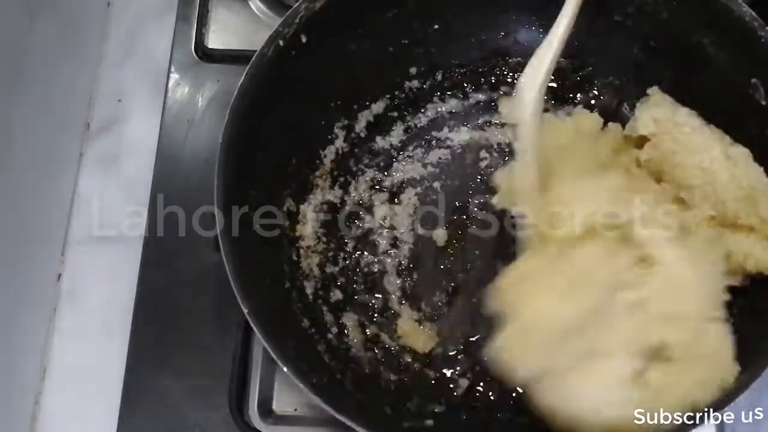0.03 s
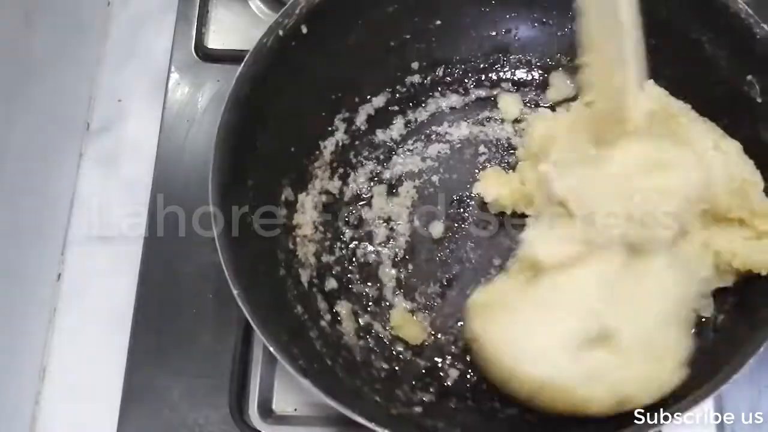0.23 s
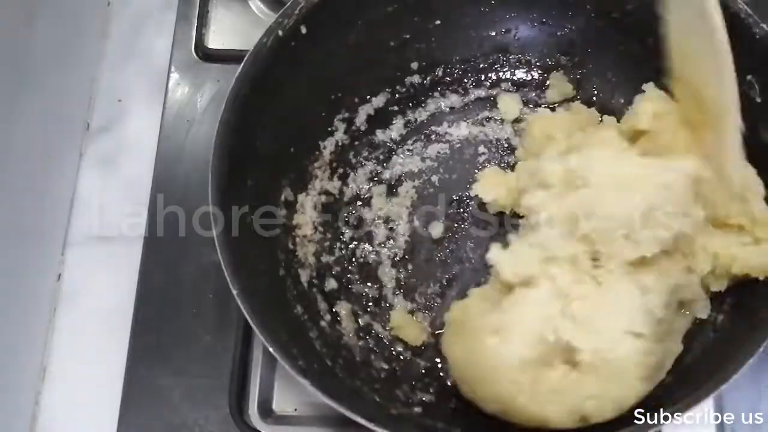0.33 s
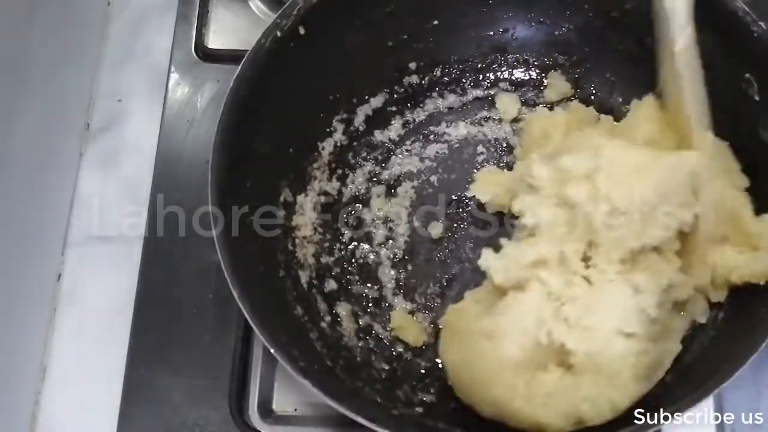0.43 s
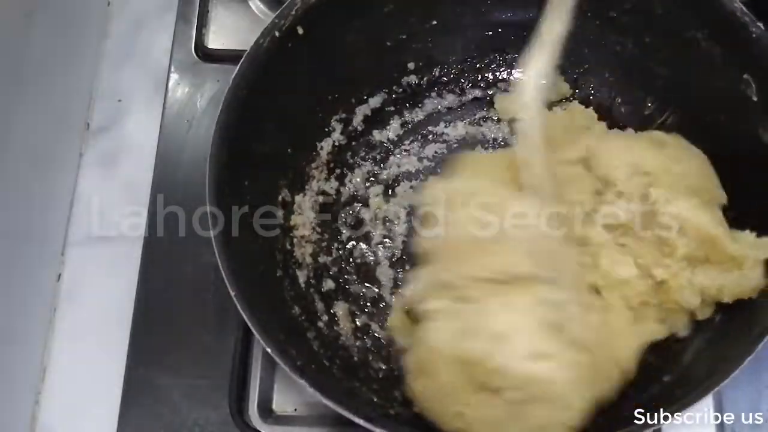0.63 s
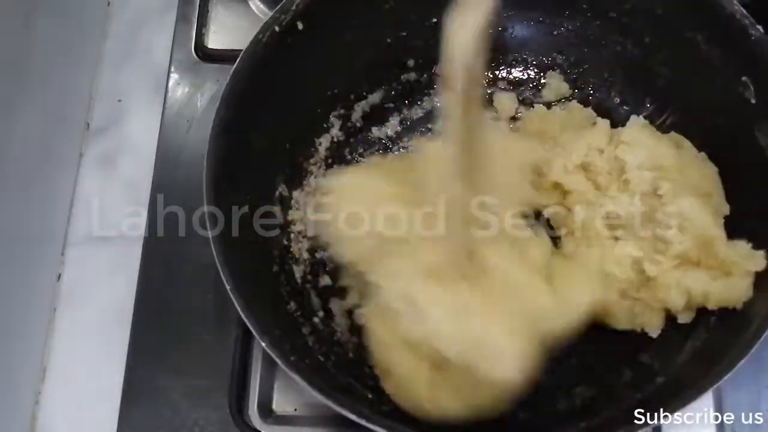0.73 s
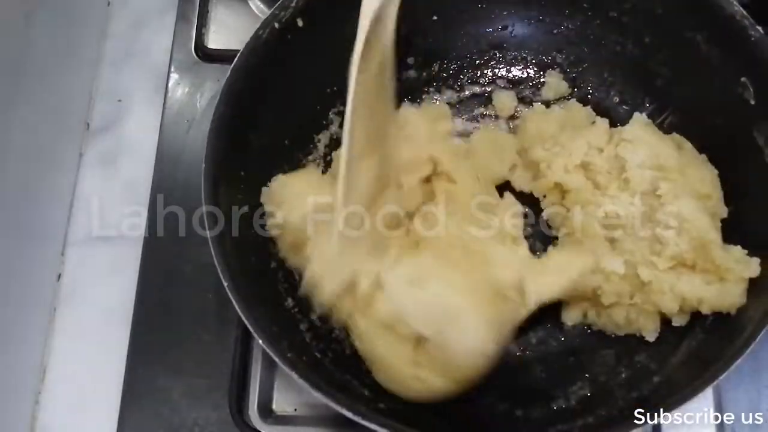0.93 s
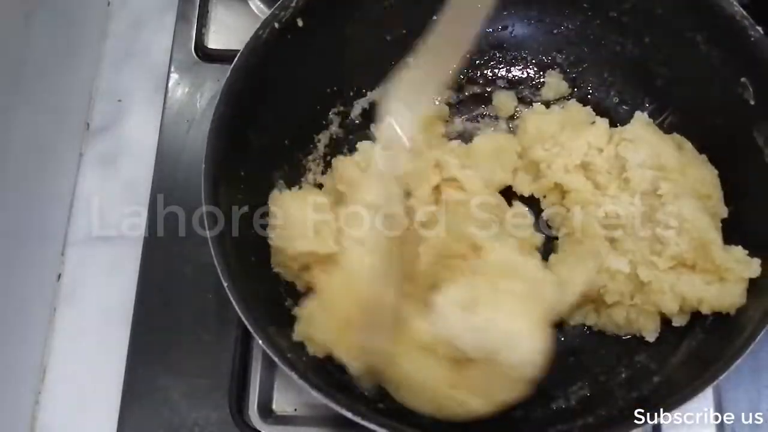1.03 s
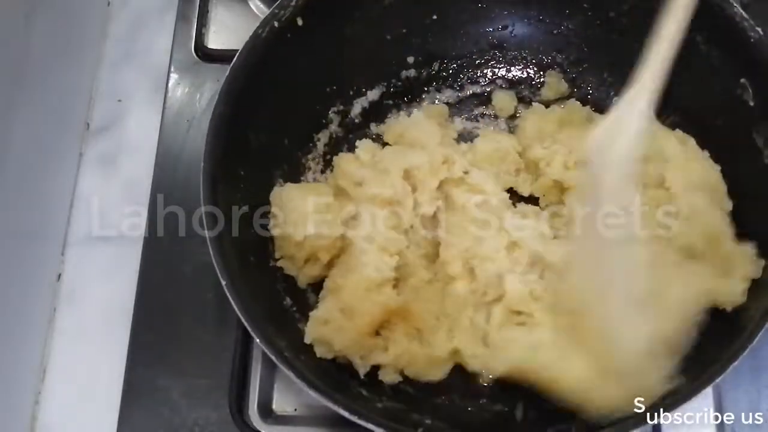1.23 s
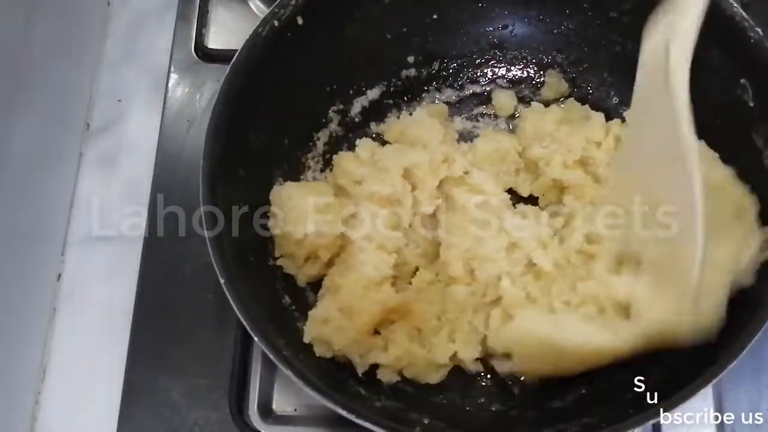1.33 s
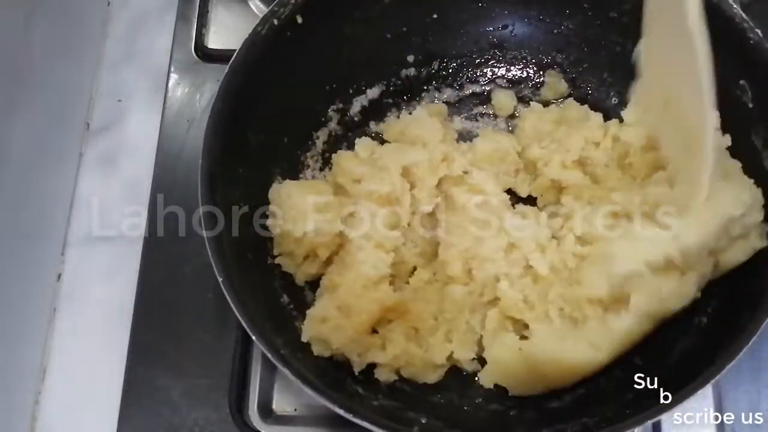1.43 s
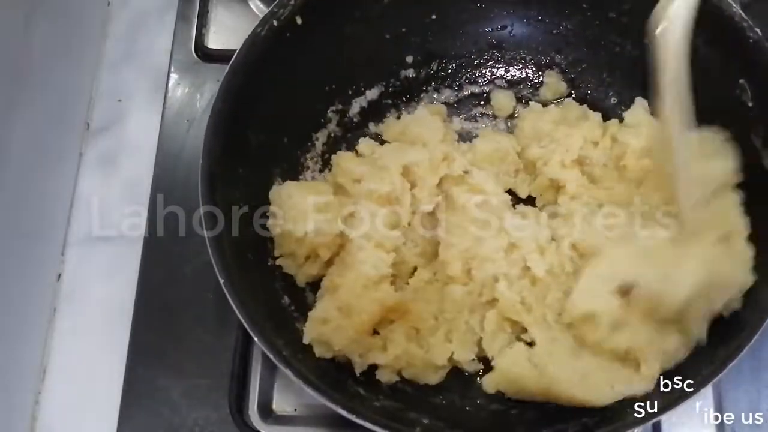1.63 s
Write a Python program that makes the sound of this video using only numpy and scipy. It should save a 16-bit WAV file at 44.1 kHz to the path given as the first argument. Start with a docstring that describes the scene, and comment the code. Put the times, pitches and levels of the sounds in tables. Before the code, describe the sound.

A spatula rubs thick paste around a heavy metal pan, which hums faintly. At about 0.2 seconds it knocks the pan with a thump, a small bounce and a brief damped ring. Tiny bubbles pop from 1.0 to 1.3 seconds, the blade rasps at 1.1, and two clacks follow around 1.2 and 1.25. Fat sizzles quietly throughout over a faint gas flame in a small kitchen.

```python
"""Fat sizzles quietly and a heavy metal pan drones as a spatula rubs and smears thick paste over its bottom.
The spatula knocks the pan three times, the first with a small bounce: the blade clacks,
the food-damped wall rings briefly and the pan thumps on its support.
Around the last two knocks bubbles pop; just before them the blade catches on the crust.
A small kitchen reverberates, over a steady background with the flame of the gas hob."""
import sys
import numpy as np
from scipy import signal
from scipy.fft import rfft, irfft
from scipy.io import wavfile

SR = 44100
rng = np.random.default_rng(int(sys.argv[2]) if len(sys.argv) > 2 else 0)


def generate_wav(signal):
    """Clip the signal to [-1, 1] and save it as 16-bit WAV at the path in sys.argv[1]."""
    frames = np.transpose(np.atleast_2d(signal))
    scaled = np.clip(frames, -1, 1) * 32767
    pcm = np.round(scaled).astype(np.int16)
    wavfile.write(sys.argv[1], SR, pcm)


N = 74970
TIME_S = np.arange(N) / SR
BINS_HZ = np.maximum(np.fft.rfftfreq(N, 1 / SR), 1)

# Envelopes. Each row: time in seconds, level in dB.
SIZZLE_LEVEL = [(0, -61), (.12, -59), (.42, -64), (.556, -58.5), (1.092, -54), (1.17, -61), (1.428, -55),
                (1.7, -55.5)]
DRONE_LEVEL = [(0, -49.5), (.04, -47), (.08, -61), (.2, -54.5), (.45, -61), (.53, -59.5), (.74, -62.5),
               (.785, -45.5), (.84, -75.5), (1.08, -59), (1.5, -74.5)]
RUMBLE_LEVEL = [(0, -57), (.45, -62), (.68, -56.5), (.85, -66), (.93, -51), (1.03, -57.5), (1.11, -54),
                (1.25, -53.5), (1.45, -64.5), (1.7, -58)]
SMEAR_LEVEL = [(0, -74.5), (.3, -60), (.73, -94), (.78, -57.5), (.93, -57), (.99, -56.5), (1.03, -52.5),
               (1.1, -51), (1.18, -62.5), (1.7, -61.5)]
# Noise spectra. Each row: frequency in Hz, relative density in dB.
BACKGROUND_SPECTRUM = [(30, 7), (120, -1.5), (220, -8.5), (300, 1.5), (450, -5.5), (750, -0.5), (950, -8),
                       (2000, -16), (4000, -22), (14800, -20.5)]
SIZZLE_SPECTRUM = [(1060, -81), (1800, -14.5), (2880, -3), (3800, -10), (4720, -8), (5310, 2.5),
                   (6000, 1.5), (7270, -1.5), (9280, -11), (13500, -17), (14700, -14), (15500, -6.5)]
RUMBLE_SPECTRUM = [(20, -22), (45, 4), (68, 4), (110, 1.5), (200, -14.5), (500, -28)]
SMEAR_SPECTRUM = [(400, -29), (1200, -11), (1520, 5.5), (1700, -18.5), (1900, 7.5), (2200, -6.5),
                  (2800, 3.5), (3800, -4), (4600, 3.5), (7000, 6.5), (9000, -33)]
WALL_CRACK = [(100, -1), (420, -5), (750, 6), (1000, 2.5), (1500, -2), (1850, -20.5), (2300, -3.5),
              (2750, -11), (3250, -1), (3800, -31), (4400, -16.5), (5550, -9.5), (7000, -27.5),
              (12000, -45)]
BLADE_CRACK = [(100, -18.5), (380, -1.5), (750, -10), (1120, 10), (1400, -9), (1650, -9.5), (1900, -13.5),
               (2800, -14.5), (4000, -41), (12000, -60)]
SUPPORT_CRACK = [(30, -28), (70, 3.5), (160, -8), (280, -4.5), (450, -15.5), (1200, -77)]
SPIT_SPECTRUM = [(3800, -27), (5600, 9), (7200, -4), (10000, -12.5), (13000, -32)]
CATCH_SPECTRUM = [(700, -25), (1570, 4), (1900, -12), (2780, 6), (3700, -14), (4600, -3), (7000, -3),
                  (10000, -28)]
# Spatula on pan. Each row: start in seconds, wall in dB, blade in dB, paste damping as divisor of the
# blade's T60, thump in dB, thump delay in seconds, bottom boom in dB, fat spit in dB.
KNOCKS = [(0.2307, -26, -32, 1.3, -14.5, 0.00423, -32.5, -53),
          (0.2465, -37.5, -56, 0.88, -57, 0.001, -51, -73),
          (1.1929, -72, -22.5, 0.88, -40.5, 0.00566, -44.5, -39),
          (1.2567, -54.5, -26.5, 1.83, -27, 0.00772, -37, -56)]
# Modes of pan wall, spatula, pan on its support and pan bottom.
# Each row: frequency in Hz, relative level in dB, T60 in seconds.
WALL_MODES = [(357, -4, 0.047), (496.6, -10, 0.22), (682, 0.5, 0.08), (763.4, -9, 0.19), (823, -8.5, 0.11),
              (1324, -13, 0.11), (1428, 2, 0.055), (1570, -20, 0.03), (2326, -6, 0.02), (3110, -25, 0.012),
              (3210, -15, 0.0054), (4314, -8, 0.022), (5680, -9, 0.02)]
BLADE_MODES = [(425, -20, 0.11), (600, -15.5, 0.072), (931, -12.5, 0.088), (1127, -3, 0.027),
               (1190, -11, 0.011), (1474, -21, 0.21), (1576, -15.5, 0.07), (2160, -32, 0.17)]
SUPPORT_MODES = [(90.3, -17.5, 0.19), (130.25, -8, 0.35), (170.6, 0, 0.18), (208, -14, 0.027)]
BOTTOM_MODES = [(297.8, -2, 0.18), (326, -1, 0.13)]
# Large bubbles. Each row: start in seconds, level in dB, centre in Hz, T60 in seconds.
POPS = [(0.989, -30, 9400, 0.0036), (1.012, -41, 5750, 0.018), (1.022, -39, 6730, 0.0095),
        (1.173, -42, 5760, .02), (1.3065, -41.5, 5830, 0.039)]
# Blade on crust. Each row: start in seconds, level in dB, T60 in seconds.
CATCHES = [(1.0835, -42.5, 0.021), (1.0975, -47, 0.031), (1.108, -50, 0.064), (1.119, -51, 0.086)]
# Stereo width. Each row: frequency in Hz, left-right coherence from 0 to 1.
COHERENCE = [(60, .99), (180, .99), (300, .76), (700, .64), (1400, .46), (3000, .13), (6000, 0), (15000, 0)]
# Stereo balance. Each row: frequency in Hz, left minus right in dB.
BALANCE_DB = [(60, -6), (170, 1), (400, 2.5), (900, -0.5), (1500, -3.5), (2700, -0.5), (5700, -6.5),
              (6800, -2), (7600, 14.5), (10000, -1.5), (13000, 0.5), (15000, -9)]
# Reverb decay. Each row: frequency in Hz, T60 in seconds.
ROOM_T60_S = [(100, 0.59), (700, 0.3), (2000, 0.46), (5000, 0.29)]
# Reverb colour. Each row: frequency in Hz, band gain in dB.
ROOM_DB = [(100, -23.5), (170, -17), (280, -5.5), (1400, -10.5), (3000, -1), (6000, -14.5)]

CUTOFF_HZ = 15700
FLAT_SPECTRUM = [(20, 0), (CUTOFF_HZ, 0)]


def from_db(db):
    """Decibels to gain."""
    return 10 ** (np.asarray(db) / 20)


def unit_rms(x):
    """Scale to rms 1."""
    return x / np.sqrt(np.mean(x ** 2) + 1e-20)


def envelope(rows):
    """Gain over time, interpolated in dB."""
    return from_db(np.interp(TIME_S, *np.transpose(rows)))


def decay(start_s, t60_s, rise_s=0.00067):
    """Rounded onset, exponential decay."""
    age_s = np.maximum(TIME_S - start_s, 0)
    return np.tanh(age_s / rise_s) ** 2 * from_db(-60 * np.minimum(age_s / t60_s, 4))


def at_hz(rows, hz):
    """Read a table on a log-frequency axis."""
    row_hz, values = np.transpose(rows)
    return np.interp(np.log(hz), np.log(row_hz), values)


def balance(hz):
    """Left and right gains at constant total power."""
    gains = from_db(np.array([[.5], [-.5]]) * at_hz(BALANCE_DB, hz))
    return gains / np.sqrt(np.mean(gains ** 2, axis=0))


def resonance(hz, width_hz):
    """Band-pass response, peak 1."""
    return 1 / (1 + 1j * (BINS_HZ ** 2 - hz ** 2) / (BINS_HZ * width_hz))


def colour(pair, spectrum):
    """Two independent signals to stereo with this spectrum, rms 1."""
    mid, side = rfft(pair)
    coherence = at_hz(COHERENCE, BINS_HZ)
    stereo = np.sqrt(1 + coherence) * mid + np.sqrt(1 - coherence) * side * [[1], [-1]]
    return unit_rms(irfft(stereo * balance(BINS_HZ) * from_db(at_hz(spectrum, BINS_HZ)), N))


def noise(spectrum):
    """Coloured stereo noise."""
    return colour(rng.standard_normal((2, N)), spectrum)


def grains(per_s, spread_db):
    """Two trains of clicks, random in time and size."""
    sizes = from_db(spread_db * np.minimum(rng.exponential(1, N), 5))
    return unit_rms((rng.random(N) < per_s / SR) * sizes * rng.standard_normal((2, N)))


def background(level_db=-59.5):
    """Steady noise of kitchen and gas flame."""
    return from_db(level_db) * noise(BACKGROUND_SPECTRUM)


def sizzle(burst_share=0.44, gain_db=2):
    """Tiny bursts in the fat merge to a hiss; single ones stand out."""
    bursts = np.sqrt(burst_share) * grains(per_s=2400, spread_db=2.0)
    hiss = np.sqrt(1 - burst_share) * rng.standard_normal((2, N))
    return from_db(gain_db) * envelope(SIZZLE_LEVEL) * colour(bursts + hiss, SIZZLE_SPECTRUM)


def smear():
    """The blade drags through grainy paste."""
    return envelope(SMEAR_LEVEL) * colour(grains(per_s=1100, spread_db=-1.5), SMEAR_SPECTRUM)


def drone(support_hz=158.8, wall_db=-14.5):
    """Rubbing makes the pan drone on its support and the wall sing faintly."""
    band = irfft(rfft(rng.standard_normal(N)) * resonance(support_hz, width_hz=5.9) ** 2, N)
    amplitude = np.abs(signal.hilbert(band))
    hum = unit_rms(band / np.sqrt(amplitude + 1e-12))  # 2:1 compression
    wall_response = 0
    for hz, db, t60_s in WALL_MODES:
        width_hz = np.log(1000) / (np.pi * t60_s)
        wall_response += from_db(db) * t60_s * resonance(hz, width_hz)
    singing = unit_rms(irfft(rfft(noise(FLAT_SPECTRUM)) * wall_response, N))
    return envelope(DRONE_LEVEL) * (hum + from_db(wall_db) * singing)


def rumble():
    """The pan moves under the blade's drag."""
    return envelope(RUMBLE_LEVEL) * noise(RUMBLE_SPECTRUM)


def snap(start_s, spectrum):
    """First pulse of a contact: minimum phase, peak 1."""
    magnitude = from_db(at_hz(spectrum, BINS_HZ)) * balance(BINS_HZ)
    cepstrum = irfft(np.log(magnitude), N)
    causal = cepstrum * (1 + np.sign(N / 2 - np.arange(N)))
    causal[:, 0] /= 2
    pulse = irfft(np.exp(rfft(causal)), N)
    return np.roll(pulse, int(start_s * SR), axis=1) / np.abs(pulse).max()


def ring(start_s, modes, sharp=0, relax_s=0.014, spread_db=1.8):
    """Struck modes; pressure raises their pitch by the fraction `sharp`, then relaxes."""
    age_s = np.maximum(TIME_S - start_s, 0)
    warped_s = age_s + sharp * relax_s * (1 - np.exp(-age_s / relax_s))
    out = 0
    for k, (hz, db, t60_s) in enumerate(modes):
        stereo_rad = (-1) ** (k // 2) * np.arccos(at_hz(COHERENCE, hz)) * np.array([[.5], [-.5]])
        wave = (-1) ** k * np.sin(2 * np.pi * hz * warped_s + stereo_rad)
        onset = np.minimum(2 * hz * age_s, 1)
        gain = from_db(db + spread_db * rng.standard_normal())
        out += gain * balance(hz) * wave * onset * decay(start_s, t60_s)
    return out


def strike(start_s, modes, spectrum, snap_db, crack_db, crack_t60_s, sharp=0):
    """One part is hit: a pulse, a crack of dense damped modes, a few clear modes."""
    crack = from_db(crack_db) * noise(spectrum) * decay(start_s, crack_t60_s)
    return from_db(snap_db) * snap(start_s, spectrum) + crack + ring(start_s, modes, sharp)


def knocks():
    """Each knock drives wall, blade, support and bottom, and squeezes out a spit of fat."""
    out = 0
    for start_s, wall_db, blade_db, damping, thump_db, delay_s, boom_db, spit_db in KNOCKS:
        damped_modes = [(hz, db, t60_s / damping) for hz, db, t60_s in BLADE_MODES]
        wall = strike(start_s, WALL_MODES, WALL_CRACK, snap_db=3, crack_db=4.0, crack_t60_s=0.068)
        blade = strike(start_s, damped_modes, BLADE_CRACK,
                       snap_db=-3, crack_db=-2.5, crack_t60_s=0.042 / damping)
        thump = strike(start_s + delay_s, SUPPORT_MODES, SUPPORT_CRACK,
                       snap_db=-24, crack_db=-19, crack_t60_s=0.4, sharp=0.063)
        boom = ring(start_s + delay_s, BOTTOM_MODES)
        spit = noise(SPIT_SPECTRUM) * decay(start_s, t60_s=0.075)
        out += from_db(wall_db) * wall + from_db(blade_db) * blade + from_db(thump_db) * thump
        out += from_db(boom_db) * boom + from_db(spit_db) * spit
    return out


def kitchen_reverb(x, delay_s=0.0018):
    """Diffuse reflections, one decay time per octave."""
    diffuse = rfft(noise(FLAT_SPECTRUM))
    response = 0
    for hz in 2.0 ** np.arange(6, 15):
        band = irfft(diffuse * (np.abs(np.log2(BINS_HZ / hz)) <= .5), N)
        fade = decay(delay_s, at_hz(ROOM_T60_S, hz))
        response += from_db(at_hz(ROOM_DB, hz)) * band * fade / np.sqrt(np.sum(fade ** 2))
    mono = x.sum(axis=0, keepdims=True) / np.sqrt(2)
    return signal.fftconvolve(mono, response, axes=1)[:, :N]


def pops(swell_s=0.0016):
    """Large bubbles burst under the blade with a soft spurt of steam."""
    out = 0
    for start_s, db, hz, t60_s in POPS:
        steam = irfft(rfft(rng.standard_normal((2, N))) * resonance(hz, width_hz=530) ** 2, N)
        swell = np.clip((TIME_S - start_s) / swell_s, 0, 1)
        out += from_db(db) * balance(hz) * unit_rms(steam) * swell * decay(start_s, t60_s)
    return out


def catches():
    """The blade's edge catches on the crust and slips free with a short rasp."""
    slips = sum(from_db(db) * decay(start_s, t60_s) for start_s, db, t60_s in CATCHES)
    return slips * noise(CATCH_SPECTRUM)


def scene():
    """Knocks, catches and pops with reverb, over stirring, sizzle and background."""
    hits = knocks() + catches() + pops()
    return hits + kitchen_reverb(hits) + smear() + drone() + rumble() + sizzle() + background()


def record(dry):
    """Steep low-pass."""
    return irfft(rfft(dry) / np.sqrt(1 + (BINS_HZ / CUTOFF_HZ) ** 300), N)


dry = scene()
out = record(dry)
generate_wav(out)
```